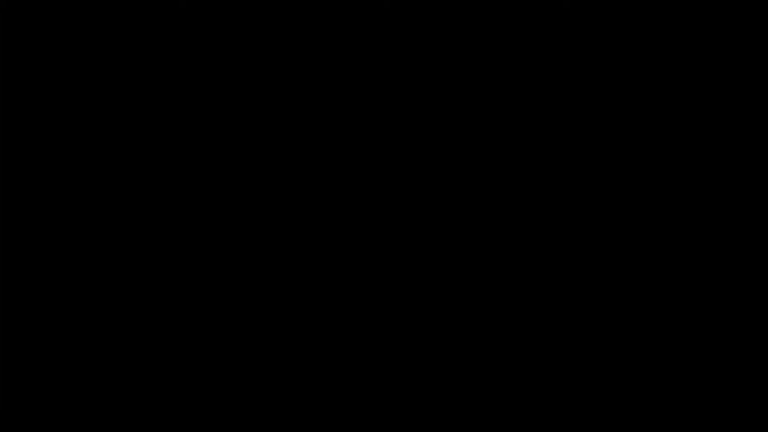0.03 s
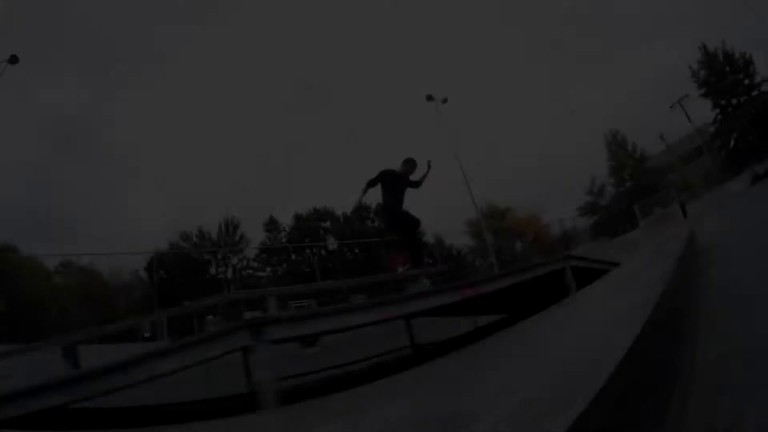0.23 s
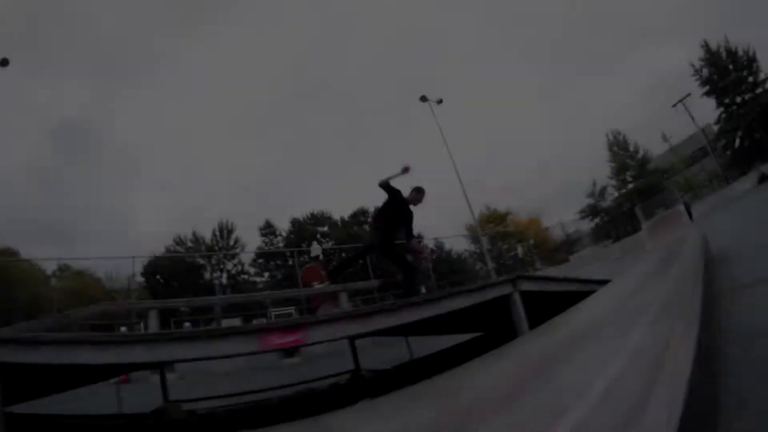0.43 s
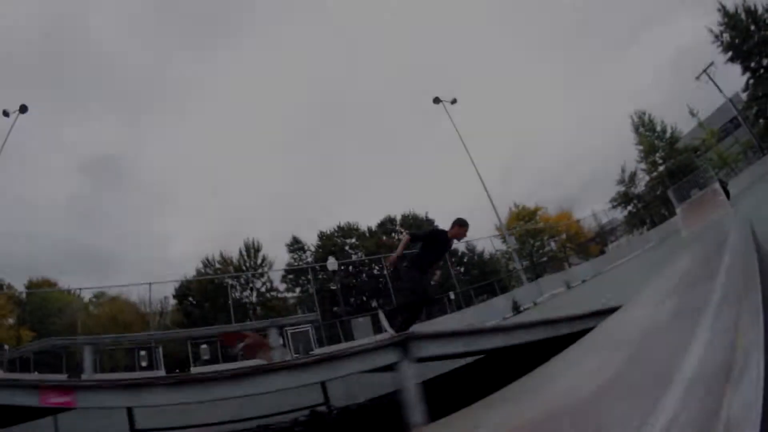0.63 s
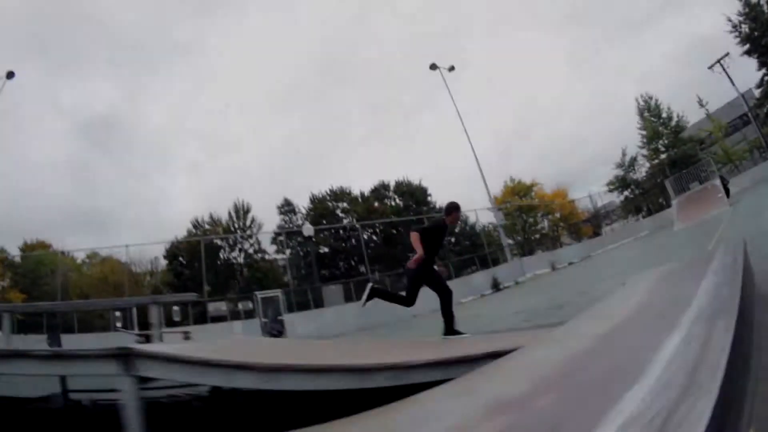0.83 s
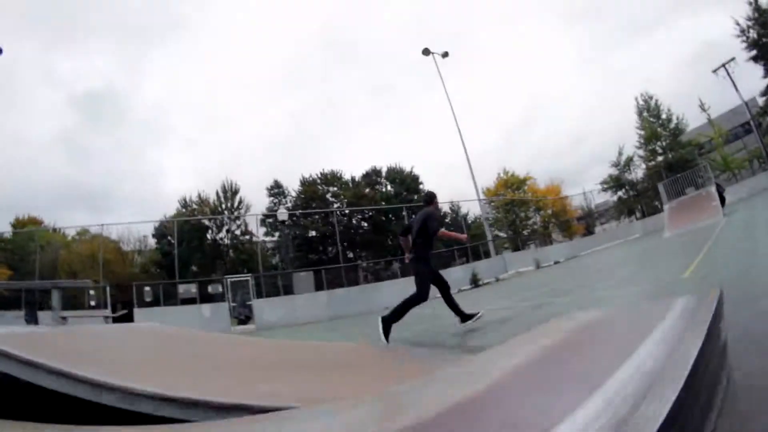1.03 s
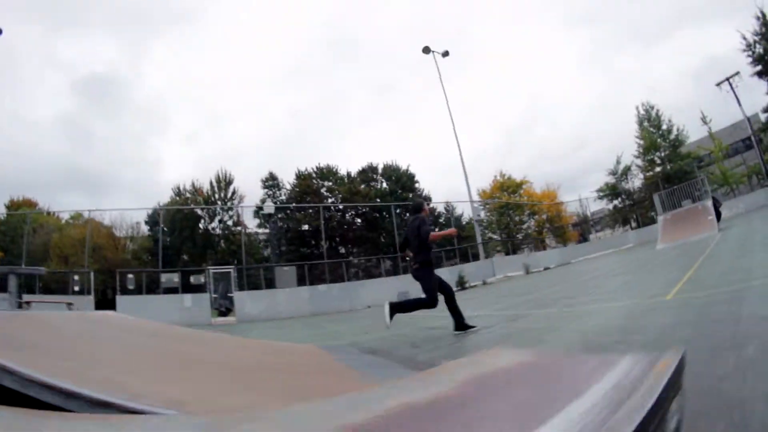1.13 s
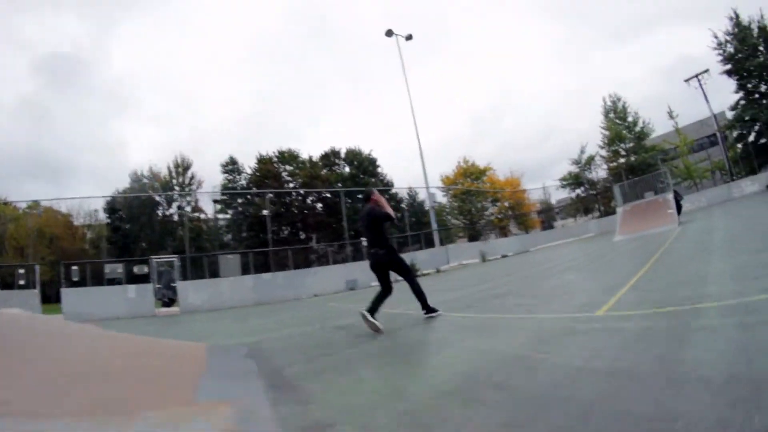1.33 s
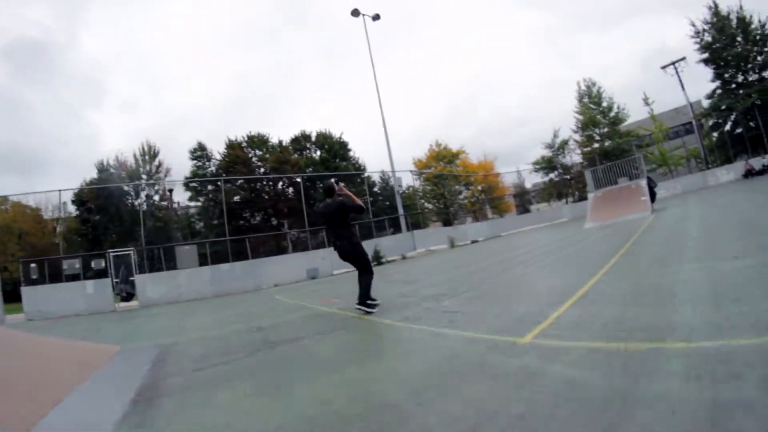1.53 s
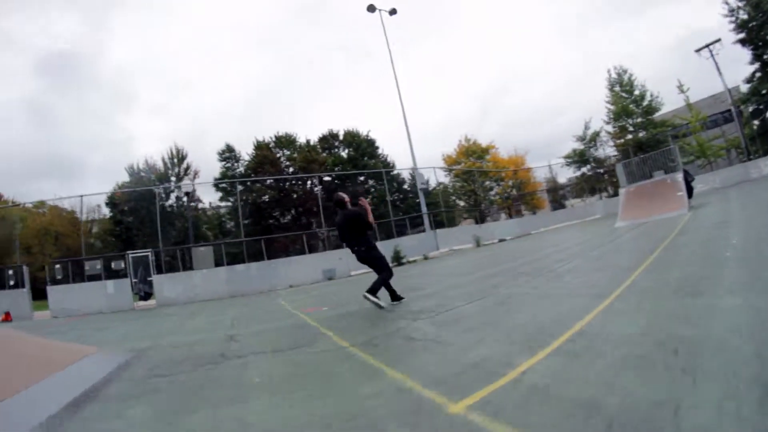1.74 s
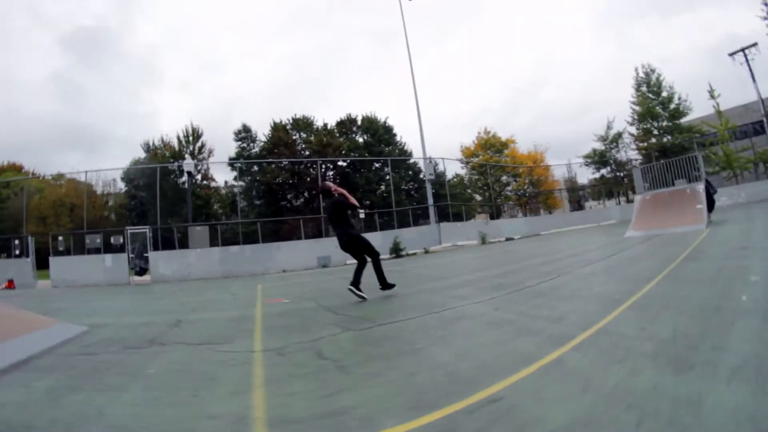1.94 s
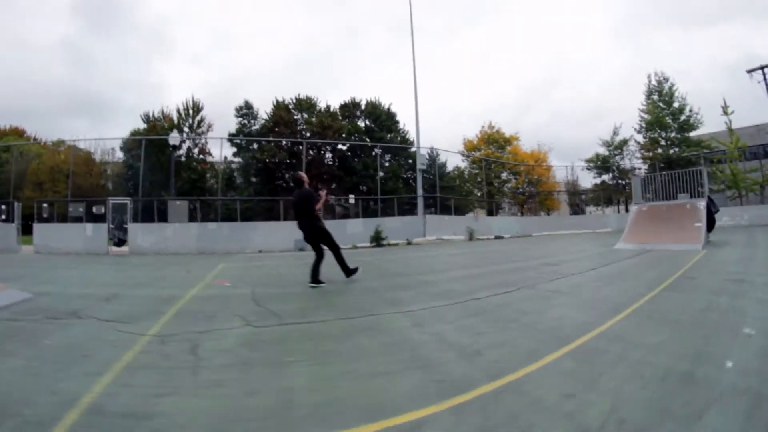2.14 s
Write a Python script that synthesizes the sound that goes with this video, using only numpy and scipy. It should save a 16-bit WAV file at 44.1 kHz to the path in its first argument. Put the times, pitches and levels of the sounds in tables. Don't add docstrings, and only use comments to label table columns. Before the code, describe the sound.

A skateboard rolls off a wooden ramp onto hard court, rumbling and knocking with sharp clicks

```python
import sys
import numpy as np
from scipy import signal
from scipy.fft import rfft, irfft
from scipy.io import wavfile
from scipy.ndimage import uniform_filter1d

SR = 44100
rng = np.random.default_rng(int(sys.argv[2]) if len(sys.argv) > 2 else 0)


def transcribe(signal):
    frames = np.atleast_2d(signal).T
    limited = np.clip(frames, -1, 1)
    pcm = np.round(limited * 32767).astype(np.int16)
    wavfile.write(sys.argv[1], SR, pcm)


def elevation(decibels):
    levels = np.asarray(decibels, float)
    return 10 ** (levels / 20)


N = 97108

# [t/s, peak level/dB, f/Hz, t60/s]
DECK_KNOCKS = [(.226, -36, 563, 0.05), (.345, -23, 1010, 0.032), (.433, -24, 484, 0.11),
               (0.588, -15, 547, 0.075), (.620, -1, 540, 0.019), (.628, -5, 590, 0.028),
               (.754, -8.5, 615, 0.038), (.772, -7, 668, 0.073), (0.7765, -8, 1430, 0.013),
               (.829, 0.5, 603, 0.045), (.8325, -5.5, 1066, 0.045), (.842, -1.5, 970, 0.017),
               (0.9303, -0.5, 1210, 0.024), (.931, -7, 680, 0.047), (0.9421, 0, 926, 0.016),
               (1.001, -10.5, 1030, 0.017), (1.022, -14.5, 636, 0.067), (1.046, -13, 544, 0.029),
               (1.121, -12.5, 565, 0.043), (1.166, -11, 588, 0.052), (1.195, -8, 549, 0.07),
               (1.304, -9, 590, 0.039), (1.515, 1, 530, 0.052), (1.626, 2, 548, 0.016),
               (1.668, -7.5, 1202, 0.026), (1.775, -4.5, 1022, 0.026), (1.854, -7.5, 606, 0.025),
               (2.030, -4, 692, 0.09), (2.043, -3, 1018, 0.023), (2.132, -3, 676, 0.049),
               (1.283, -8, 625, 0.025), (1.248, -12, 627, 0.022), (1.466, -6, 553, .03),
               (1.434, -5, 676, 0.025), (1.443, -1, 625, .02), (1.526, -4, 370, 0.028),
               (1.546, -3, 524, 0.036), (1.571, -13, 500, .03), (1.599, -7.5, 666, 0.045),
               (1.688, -1, 546, 0.018), (1.702, -1.5, 586, 0.045), (1.735, -1, 573, 0.023),
               (1.809, -4, 615, 0.014), (1.827, -2.5, 526, 0.027), (1.889, -14.5, 598, 0.049),
               (1.932, -2, 638, 0.037), (1.962, -3, 666, 0.029), (2.081, -12.5, 515, 0.044),
               (2.142, -4.5, 646, .02)]


def band(x, hz, width):
    return signal.lfilter(*signal.iirpeak(min(hz, .45 * SR), hz / min(width, .45 * SR), fs=SR), x)


def band_twice(x, hz, width):
    return band(band(x, hz, width), hz, width)


def unit(x):
    return x / np.sqrt(np.mean(x ** 2))


def colour(x, points):
    point_hz, point_db = np.array(points).T
    hz = np.maximum(np.fft.rfftfreq(len(x), 1 / SR), 1)
    gain_db = np.interp(np.log(hz), np.log(point_hz), point_db, left=-99)
    return irfft(rfft(x) * elevation(gain_db), len(x))


def walk(rate):
    hold = int(SR / rate)
    steps = np.repeat(rng.standard_normal(N // hold + 1), hold)
    return unit(uniform_filter1d(steps, hold)[:N])


def grit(per_s, spread_db):
    hit = rng.random(N) < per_s / SR
    size = rng.exponential(size=N)
    return hit * rng.standard_normal(N) * elevation(spread_db * size)


def add(out, s, x):
    i = int(s * SR)
    out[i:i + len(x)] += x[:N - i]


def deck_drum(t, court, grains, bumps):
    # [f/Hz, width/Hz, level midway between ramp and court/dB, level on ramp over level on
    # court/dB]
    deck_modes = [(141.4, 12, -15, -5), (244, 61.5, -14, 7.5), (303.8, 39.3, -6, 1.5), (364, 51.6, -6, -9),
                  (515, 65, 1.5, 0.5), (590, 71, -1, 0), (662.8, 73, 0, -7.5), (865, 168, -8.5, 3),
                  (1061, 125, -9, -2), (1217, 160, -12, 5.5), (1590, 170, -24, 8)]
    # [t/s, length/s, level/dB]
    surface_patches = [(0.646, 0.014, -9), (0.736, 0.0097, -5.5), (0.829, 0.013, 9), (.575, 0.018, 1),
                       (1.3, 0.04, -4), (1.414, 0.029, -1.5), (1.501, 0.0067, 4), (1.98, .012, 1),
                       (1.637, .02, -4.5), (1.73, 0.012, -1.5), (1.748, 0.014, -5.5), (1.845, 0.011, -12),
                       (1.955, 0.013, 0), (1.995, 0.018, 4), (2.011, 0.012, -3), (2.157, 0.012, -4)]
    hop_s, hop_db = 0.0073, -3
    even, even_s = 0.52, 0.007
    drum = np.zeros(N)
    for hz, width, db, ramp_db in deck_modes:
        push = unit(grains) + 1.45 * rng.standard_normal(N)
        mode = unit(band_twice(push, hz, 1.62 * width)) * np.sqrt(width / 100)
        drum += elevation(db + ramp_db * (0.5 - court)) * mode
    drum = drum / uniform_filter1d(drum ** 2, int(even_s * SR)) ** (even / 2)
    patch_db = np.zeros(N)
    for at, length, db in surface_patches + [(knock[0], hop_s, hop_db) for knock in DECK_KNOCKS]:
        patch_db += db * np.exp(-2 * ((t - at) / length) ** 2)
    return unit(drum * elevation(1.92 * bumps)) * elevation(patch_db)


def truck_rattle(court, grains, bumps):
    # [f/Hz, level/dB]
    ramp_colour = [(880, -17), (1500, 12), (1710, 11), (2440, 2.5), (3220, -3), (3660, -3), (4920, -9),
                   (16000, -30.5)]
    # [f/Hz, level/dB]
    court_colour = [(880, -16), (1500, -4.5), (2060, -16.5), (3960, -15), (4640, -29), (5880, -31),
                    (11300, -51.5), (16000, -55)]
    # [f/Hz, width/Hz, level/dB]
    truck_modes = [(3200, 340, -12.5), (4580, 1100, -17)]
    smear = rng.standard_normal(900) * np.exp(-np.arange(900) / SR / 0.00046)
    smeared_grit = signal.fftconvolve(grains, smear)[:N]
    jitter = unit(grit(9000, 1))
    chatter_db = 1.35 * (2.0 - 0.67 * court) * (.5 * bumps + walk(150))
    shake = unit((jitter + .5 * unit(smeared_grit)) * elevation(chatter_db))

    def level_mids(x):
        return x / np.std(band(x, 3500, 2500))

    on_ramp = level_mids(colour(shake, ramp_colour))
    for hz, width, db in truck_modes:
        on_ramp += elevation(db) * unit(band_twice(shake, hz, width))
    on_court = level_mids(colour(shake, court_colour))
    return (1 - court) * on_ramp + court * on_court


def low_rumble():
    # [f/Hz, level/dB]
    rumble_colour = [(12, -54), (20, -40), (59, -6.5), (102, -5), (140, -1), (200, -10), (260, -30.5),
                     (440, -120)]
    rumble_db, gust_db = -26, 4.5
    air = colour(rng.standard_normal(N), rumble_colour + [(400, -61.5)])
    return unit(air) * elevation(rumble_db + gust_db * walk(13))


def rolling(t):
    # [t/s, rolling level/dB, rattle level over the roll/dB]
    roll_levels = [(.118, -87, -42), (.15, -66, -9), (0.152, -67.5, 7.5), (.23, -47.5, -18.5),
                   (.33, -37, -19), (.45, -30, -22.5), (.6, -17.5, -27), (.79, -17.5, -26.5),
                   (.87, -25.5, -26.5), (.96, -27.5, -27.5), (1.06, -29, -29.5), (1.172, -23, -25.5),
                   (1.185, -23, -21), (1.402, -15, -26.5), (1.55, -13, -46), (1.802, -15.5, -33.5),
                   (1.932, -14.5, -27), (2.2, -18, -35)]
    court_from_s, rumble_top_db = 1.124, -19.5
    s, level_db, rattle_db = np.array(roll_levels).T
    level = elevation(np.interp(t, s, level_db, left=-140))
    court = np.clip((t - court_from_s) / 0.35, 0, 1)
    bumps = walk(55.29) + 0.27 * walk(16)
    grains = grit(2500, 2.0)
    deck = deck_drum(t, court, grains, bumps)
    rattle = truck_rattle(court, grains, bumps) * elevation(np.interp(t, s, rattle_db))
    return level * (deck + rattle) + np.minimum(level, elevation(rumble_top_db)) * low_rumble()


def rail():
    # [f/Hz, level/dB]
    rail_modes = [(1270, -58), (3870, -74)]
    start_s, t60_s = .151, 1.5
    t = np.maximum(np.arange(N) / SR - start_s, 0)
    ring = sum(elevation(db) * unit(band(rng.standard_normal(N), hz, 40)) for hz, db in rail_modes)
    return (t > 0) * elevation(-60 * t / t60_s) * ring


def wind_thuds():
    # [t/s, length/s, level/dB]
    thud_events = [
        (0.337, 0.063, -52),
        (0.635, 0.086, -34.5),
        (1.344, .08, -37),
        (1.465, 0.0596, -47),
        (0.212, .08, -69),
        (0.948, 0.082, -39.5),
        (1.264, .05, -57),
        (1.715, 0.098, -46),
    ]
    out = np.zeros(N)
    air = unit(band_twice(rng.standard_normal(N), 70.6, 120))
    for s, length, db in thud_events:
        count = int(length * SR)
        gust = unit(air[int(s * SR):][:count])
        add(out, s - length / 2, elevation(db) * np.hanning(count) * gust)
    return out


def knocks():
    push_cycles = 0.25
    out, t = np.zeros(N), np.arange(3000) / SR
    for s, db, hz, t60 in DECK_KNOCKS:
        upper_turn, lower_turn = rng.random(2)
        ring = np.sin(2 * np.pi * hz * t)
        ring += 0.24 * np.sin(2 * np.pi * (1.4 * hz * t + upper_turn))
        ring += 0.39 * np.sin(2 * np.pi * (0.708 * hz * t + lower_turn))
        rise = (1 - np.exp(-t * hz / push_cycles)) ** 2
        add(out, s, elevation(db) * ring * rise * elevation(-60 * t / t60))
    return signal.lfilter(*signal.butter(2, 220, "high", fs=SR), out)


def clicks():
    # [t/s, peak level/dB, centre f/Hz, t60/s]
    click_events = [(0.324, -44, 8040, 0.026), (0.345, -15.5, 3500, 0.0089), (0.368, -31, 3000, 0.014),
                    (0.384, -45, 7000, 0.078), (.503, -26, 3300, 0.035), (0.74, -25, 2470, 0.022),
                    (.830, -7, 1810, 0.027), (0.843, -14, 1890, 0.014), (0.882, -32.5, 11000, 0.04),
                    (0.8841, -21.5, 3080, 0.05), (0.9303, -19, 2190, 0.022), (0.943, -30, 6000, 0.026),
                    (0.976, -51, 8000, 0.018), (0.994, -42, 5000, 0.044), (1.153, -37, 4000, 0.014),
                    (1.188, -22.5, 3270, 0.17), (1.342, -32, 3700, 0.07), (1.584, -45, 2400, .02),
                    (1.626, -45, 7000, 0.023), (1.666, -46, 7000, .02), (1.676, -23.5, 3200, 0.025),
                    (1.73, -30, 3000, 0.059), (1.814, -8.5, 3040, 0.019), (1.8555, -15, 2800, 0.012),
                    (1.871, -9.5, 2540, 0.03), (1.889, -30, 3740, .02), (1.903, -41.5, 5800, .03),
                    (1.916, -22, 3280, 0.031), (2.115, -45, 9030, .04), (2.147, -31.5, 3540, 0.034),
                    (0.586, -29, 3000, .025), (0.607, -27, 3000, 0.017), (.622, -23.5, 3200, .03),
                    (.647, -28, 2680, 0.017), (.673, -24, 2600, .025), (.78, -36, 2600, 0.023),
                    (.81, -50, 9000, .03), (0.933, -33, 10700, 0.025), (0.834, -34, 12000, 0.054),
                    (1.009, -45.5, 10000, 0.027), (1.244, -26, 3320, 0.075), (1.474, -26, 2400, 0.042),
                    (1.797, -39, 3300, 0.016), (1.84, -29, 3800, 0.016), (1.927, -38, 5900, .03),
                    (1.945, -38, 5000, .025), (1.959, -40, 3700, 0.023)]
    # [f/Hz, level/dB, t60/s]
    metal_modes = [(1852, 7.5, 0.031), (2296, 0.5, 0.031), (3000, -11, 0.041), (3700, -9.5, 0.024),
                   (4490, -6.5, 0.0038), (5800, -1.5, 0.0061), (7300, -12, 0.0082), (9500, -34, 0.0064)]
    body_q, edge_hz, edge_db, metal_db, dull_hz = 1, 6360, -22, -7, 7500
    echo_db, echo_stretch = -21, 6.9
    out, t = np.zeros(N), np.arange(6000) / SR
    for s, db, hz, t60 in click_events:
        noise = np.tanh(2 * rng.standard_normal(len(t)))
        shape = elevation(-60 * t / t60) + elevation(echo_db - 60 * t / (echo_stretch * t60))
        body = band_twice(noise * shape, hz, hz / body_q)
        ring = np.zeros(len(t))
        for (f, gain, decay), odd in zip(metal_modes, rng.standard_normal(len(metal_modes))):
            tone = np.sin(2 * np.pi * f * (1 + 0.013 * odd) * t + odd)
            ring += elevation(gain - 60 * t / decay) * tone
        ring = band(ring, hz, 2 * hz)
        edge = band_twice(noise * elevation(-60 * t / (0.1 * t60)), edge_hz, 5000)
        crack = 0.68 * body / np.abs(body).max()
        crack += elevation(metal_db) * ring / np.abs(ring).max()
        crack += elevation(edge_db) * edge / np.abs(edge).max()
        dulled = signal.lfilter(*signal.butter(1, max(dull_hz, 1.1 * hz), fs=SR), crack)
        add(out, s, elevation(db) * dulled)
    return out


def scuffs():
    # [t/s, length/s, level/dB]
    scuff_events = [
        (0.503, 0.027, -60),
        (0.574, 0.1, -63.5),
        (0.653, 0.091, -57),
        (0.75, .045, -57),
        (1.17, .045, -67),
        (1.233, 0.034, -61),
        (1.385, 0.037, -57.5),
        (1.475, 0.06, -53.5),
        (2.138, 0.056, -56),
    ]
    out = np.zeros(N)
    hiss = unit(band(rng.standard_normal(N), 13100, 12000)) * elevation(2.7 * walk(250))
    for s, length, db in scuff_events:
        count = int(length * SR)
        add(out, s, elevation(db) * signal.windows.tukey(count, .7) * hiss[int(s * SR):][:count])
    return out


def wheel_slide():
    start_s, t60_s, slide_hz, slide_db = 1.178, 2.3, 3860, -49.5
    t = np.arange(SR // 3) / SR
    rough = rng.standard_normal(len(t)) * elevation(1.8 * walk(440)[:len(t)])
    hiss = unit(band_twice(rough, slide_hz, 4100))
    fade = np.minimum(t / 0.008, 1) * np.minimum((t[-1] - t) / 0.1, 1)
    out = np.zeros(N)
    add(out, start_s, elevation(slide_db - 60 * t / t60_s) * fade * hiss)
    return out


def squeaks():
    # [t/s, length/s, f/Hz, level/dB]
    squeak_events = [
        (1.503, 0.014, 2164, -29.5),
        (1.545, 0.009, 2200, -43),
        (2.171, 0.0071, 3020, -31),
        (2.185, 0.02, 2580, -33),
    ]
    partial_levels = [
        [-6, 0, -6, -14, -26],
        [-12, 0, -10, -14, -24],
        [0, -20, -30, -36, -40],
        [0, -20, -30, -36, -40],
    ]
    rise, rough, squeeze = .07, .75, .91
    out, shaky = np.zeros(N), walk(790)
    for (s, length, hz, db), partials in zip(squeak_events, partial_levels):
        u = np.linspace(0, 1, int(length * SR))
        phase = 2 * np.pi * np.cumsum(hz * (1 + rise * u)) / SR
        phase += .3 * rough * np.roll(shaky, int(s * SR))[:len(u)]
        tone = sum(elevation(p) * np.sin((k + 1) ** squeeze * phase) for k, p in enumerate(partials))
        add(out, s, elevation(db) * np.sin(np.pi * u) ** .5 * elevation(-8 * u) * tone)
    return out


def scene():
    board = rolling(np.arange(N) / SR) + knocks() + clicks() + wheel_slide()
    shoe = scuffs() + squeaks()
    return (board + shoe + rail() + wind_thuds())[None]


def band_limit(x):
    return signal.sosfilt(signal.butter(12, 16510, fs=SR, output="sos"), x)


def record(dry):
    rounded = np.tanh(dry) / 1.1
    top_cut = signal.ellip(8, .2, 60, 15900, fs=SR, output="sos")
    return band_limit(signal.sosfilt(top_cut, rounded))


dry = scene()
out = record(dry)
transcribe(out)
```